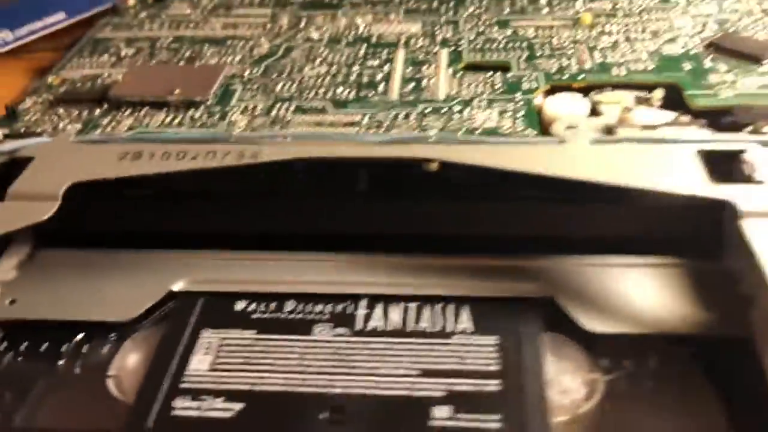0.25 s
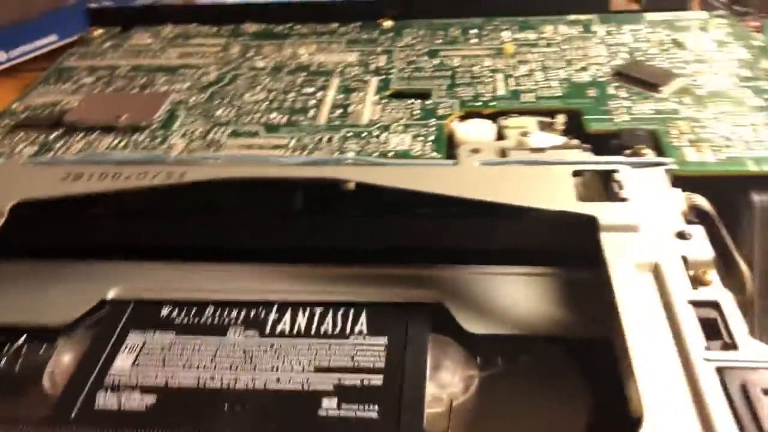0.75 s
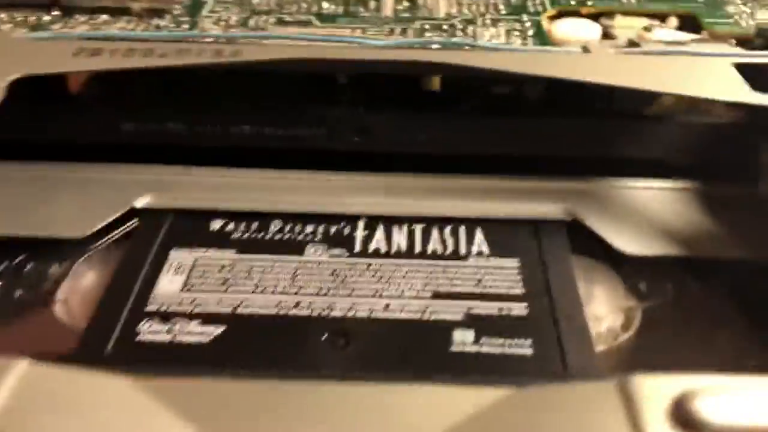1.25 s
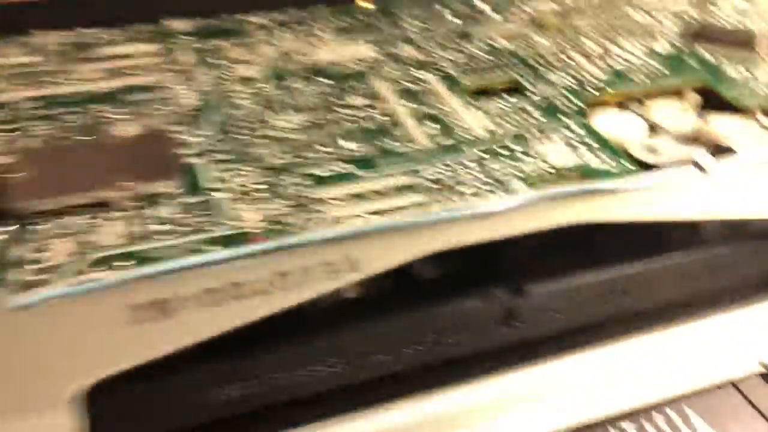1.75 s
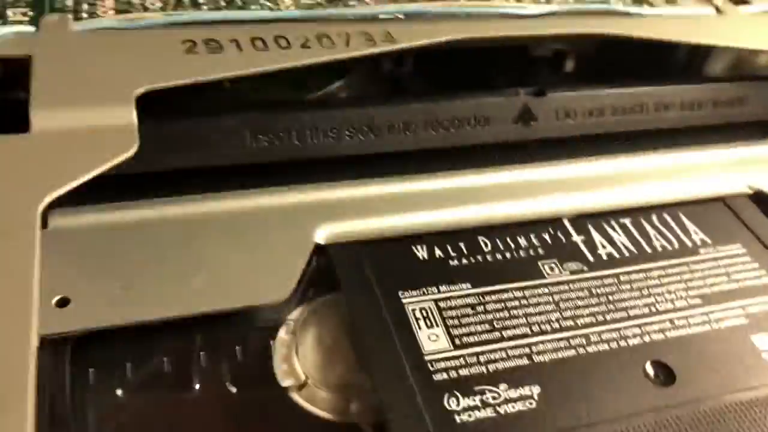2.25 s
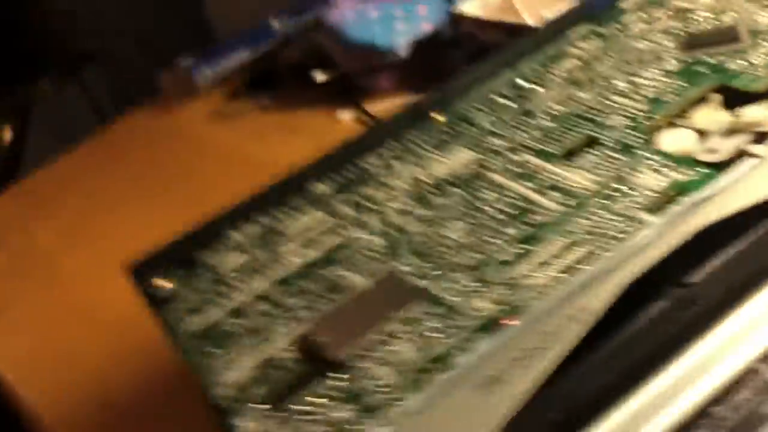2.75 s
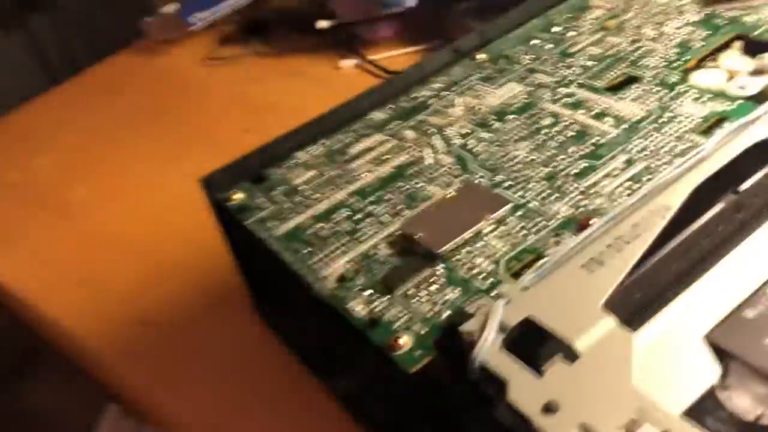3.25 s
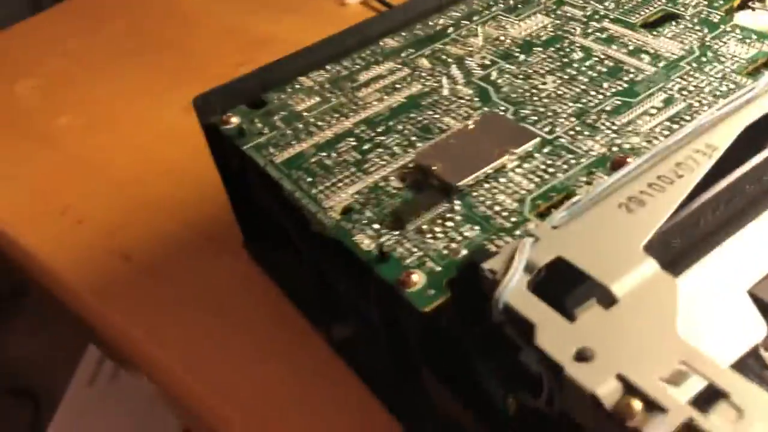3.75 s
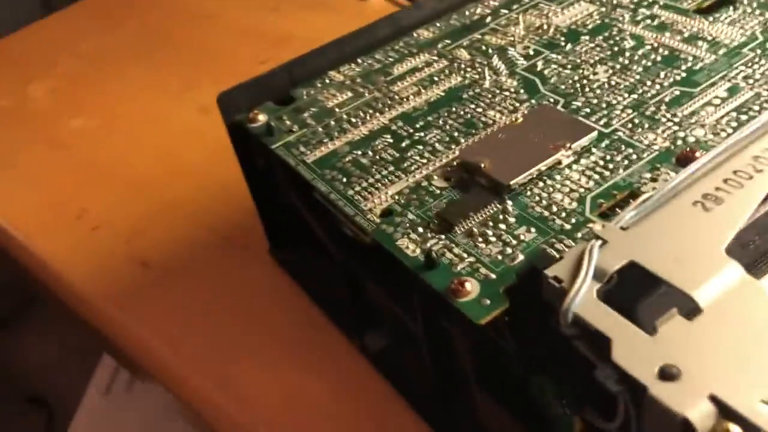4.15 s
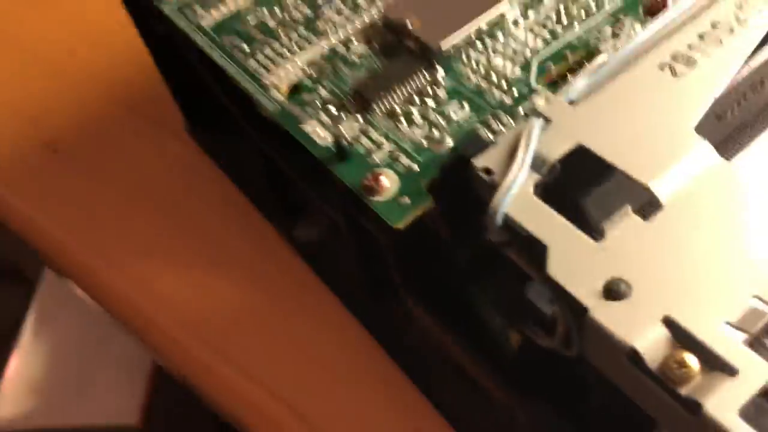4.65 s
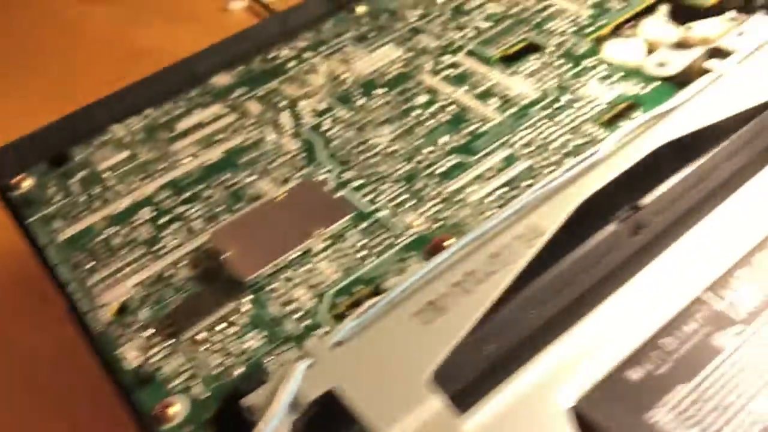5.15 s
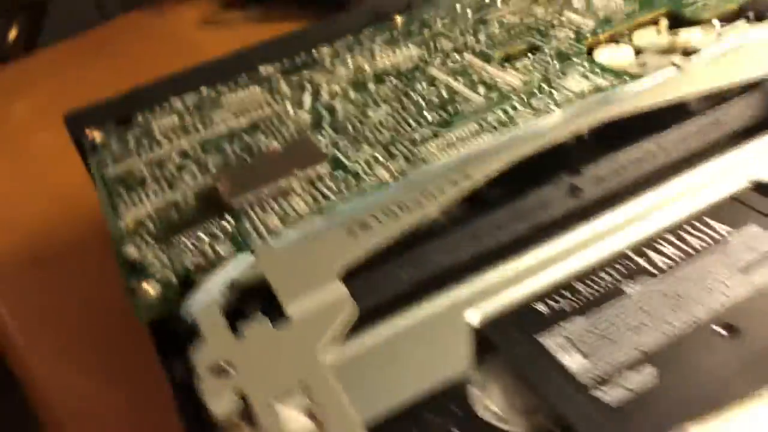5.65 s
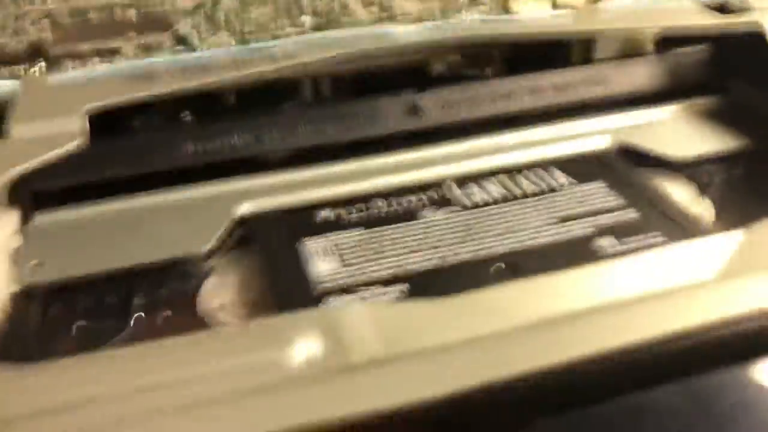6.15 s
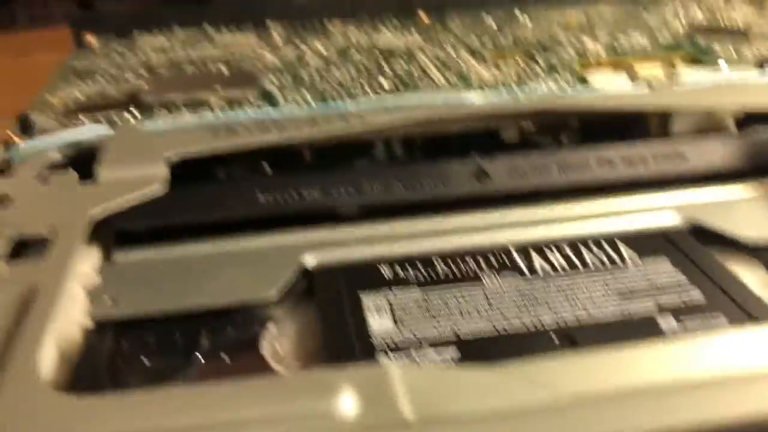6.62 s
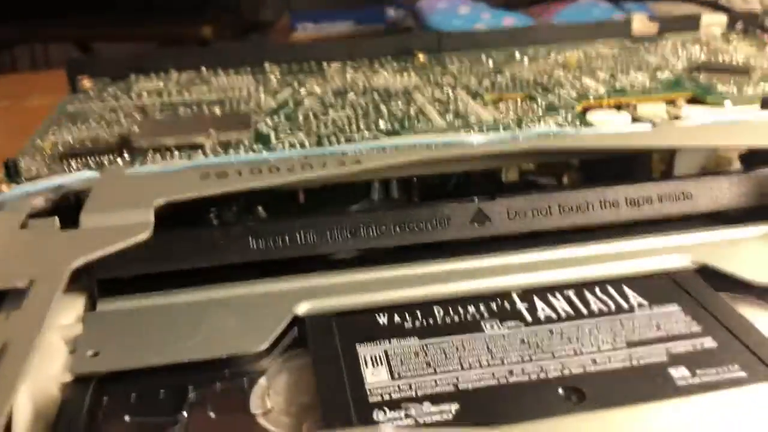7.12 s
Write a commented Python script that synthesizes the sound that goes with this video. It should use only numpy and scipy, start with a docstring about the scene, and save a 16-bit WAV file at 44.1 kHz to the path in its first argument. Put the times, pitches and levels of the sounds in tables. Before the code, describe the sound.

A cassette deck hums quietly as something scrapes over a wooden table and slams its metal chassis, followed by small clicks, thuds and faint rustles.

```python
"""Something is dragged over a wooden table and slams against the chassis of an open tape deck, very close:
friction is coloured noise driven by one speed, and blows are decaying noise, gliding knocks and chassis modes.
Parts click and clunk, short narrow-band notes sound, and thuds ring the table's low modes. Hands rustle on
and tap a camera's shell, heard as filtered noise and gliding sines. Transformer and head drum hum as unsteady
sines in a quiet room of faint noise and short reverberation."""
import sys
import numpy as np
from scipy import signal
from scipy.fft import rfft, irfft, next_fast_len
from scipy.io import wavfile
from scipy.ndimage import uniform_filter1d, map_coordinates

SR = 44100
rng = np.random.default_rng(int(sys.argv[2]) if len(sys.argv) > 2 else 0)


def elevation(decibels):
    """Turn decibel levels (scalar or array-like) into linear amplitude ratios."""
    levels = np.asarray(decibels, float)
    return 10 ** (levels / 20)


def wav_out(sig):
    """Save sig, one row per channel (or a flat mono array), as 16-bit PCM at SR to the path in sys.argv[1]."""
    wavfile.write(sys.argv[1], SR, np.round(np.clip(np.atleast_2d(sig).T, -1, 1) * 32767).astype(np.int16))


N = 325546


def unit(x):
    """Normalization of power: scale to rms 1."""
    return x / np.sqrt(np.mean(x ** 2) + 1e-20)


def peak(x):
    """Normalization of amplitude: scale to peak 1."""
    return x / np.abs(x).max()


def along(points, hz):
    """Logarithmic frequency scale: (frequency, value) points are interpolated on a log axis."""
    f, v = np.transpose(points)
    return np.interp(np.log(hz + 1), np.log(f + 1), v)


def wobble(rate):
    """Slow random modulation: a smooth curve through normal values, rate knots a second."""
    knots = rng.standard_normal(int(N * rate / SR) + 4)
    return map_coordinates(knots, [np.arange(N) * rate / SR])


def filtered(x, response):
    """Linear filtering: the spectrum of x times a complex response of frequency."""
    size = next_fast_len(len(x) + 8192)
    spectrum = rfft(x, size) * response(np.fft.rfftfreq(size, 1 / SR))
    return irfft(spectrum, size)[:len(x)]


def resonance(hz, centre_hz, width_hz):
    """Simple resonance: the causal band-pass response of one damped oscillator."""
    return 1j * hz * width_hz / (centre_hz ** 2 - hz ** 2 + 1j * hz * width_hz)


def noise(spectrum, patchy_db, grainy_db):
    """Coloured noise of rms 1: random modulation gives patches of random gain and a fast grain."""
    grains = rng.standard_normal(N) * elevation(grainy_db * wobble(400))
    z = signal.stft(grains, nperseg=256)[2]
    field = uniform_filter1d(rng.standard_normal(z.shape), 3, 0)
    field = uniform_filter1d(field, 8, 1)
    x = signal.istft(z * elevation(patchy_db * unit(field)), nperseg=256)[1][:N]
    return unit(filtered(x, lambda hz: elevation(along(spectrum, hz))))


def crowded(x, depth_db, size):
    """Modal crowding: many small parts ring along as narrow random peaks and dips that shift in time."""
    z = signal.stft(x, nperseg=512)[2]
    field = unit(uniform_filter1d(rng.standard_normal(z.shape), size, 1))
    gain_db = depth_db * field - depth_db ** 2 / 9  # the offset holds the mean power
    return signal.istft(z * elevation(gain_db), nperseg=512)[1][:N]


def ring(modes, t, spread_db):
    """Modal superposition: damped (frequency, level, t60) sines, at new strengths for each blow."""
    out = 0
    for hz, db, t60 in modes:
        strength_db = db + rng.normal(0, spread_db)
        out = out + elevation(strength_db - 60 * t / t60) * np.sin(2 * np.pi * hz * t)
    return out


def gliding(hz, t, t60, drop, drop_s):
    """Dispersion of a bending wave: its high part arrives first, so the pitch drops fast to rest."""
    turns = hz * (t + drop * drop_s * (1 - np.exp(-t / drop_s)))
    return np.sin(2 * np.pi * turns) * elevation(-60 * t / t60) * (1 - np.exp(-t / .0012))


# spectrum of the quiet room: (frequency [Hz], relative level per Hz [dB])
QUIET_SPECTRUM = [(20, -29), (35, -13), (55, -3), (100, -12), (200, -5.5), (330, -8), (490, -20),
                  (900, -25.5), (1700, -26.5), (2500, -33.5), (5000, -41), (10000, -40), (15800, -40),
                  (16400, -70)]


def room_tone():
    """Stationary background noise: a quiet room as coloured noise at -64 dB rms."""
    return elevation(-64) * noise(QUIET_SPECTRUM, patchy_db=2, grainy_db=0)


# decay of the room: (frequency [Hz], t60 [s])
ROOM_DECAY = [(100, .25), (1000, .22), (5000, .2), (15000, .12)]


def room(x):
    """Reverberation: a diffuse noise tail in which each frequency dies at its own speed."""
    hz, t, z = signal.stft(rng.standard_normal(SR // 2), SR, nperseg=256)
    decay = elevation(-60 * t / along(ROOM_DECAY, hz)[:, None])
    tail = signal.istft(z * decay, SR, nperseg=256)[1]
    delayed = np.pad(x, (300, 0))  # samples before the first reflections
    return signal.fftconvolve(delayed, tail / np.linalg.norm(tail))[:N]


# hum tones near multiples of the drum's turning rate:
# (frequency [Hz], resting level [dB rms], waver depth [dB])
HUM_TONES = [(30.2, -84.5, 2), (57.36, -69.5, 0), (90, -70.5, 2.5), (119.6, -59, 1), (149.6, -74.5, 3.5),
             (175, -70.5, 2.5), (209.5, -72, 1.5), (246, -76, 4), (363, -79.5, 2.5)]


def hum():
    """Harmonic excitation: transformer and drum motor as sines unsteady in level and phase."""
    t = np.arange(N) / SR
    out = np.zeros(N)
    for hz, db, waver_db in HUM_TONES:
        level = elevation(db + waver_db * wobble(9))
        out += level * np.sin(2 * np.pi * hz * t + .2 * wobble(4))
    return np.sqrt(2) * out  # from rms to peak


# finger taps on the camera's shell:
# (time [s], shell peak level [dB], resting shell pitch [Hz], click level over the shell [dB])
SHELL_TAPS = [(0.014, -36.5, 326, 8), (0.061, -40.5, 308, -2.5), (2.996, -21.5, 494.9, -13),
              (3.014, -47.5, 512, -3), (3.037, -50.5, 453, -1.5), (3.06, -39.5, 506, 3.5),
              (3.083, -51.5, 471, -11), (3.403, -46, 402, -2), (3.432, -46.5, 446.2, 7),
              (5.061, -51, 339, -7.5), (5.115, -47, 325, -22.5), (5.471, -49.5, 332, -14),
              (6.284, -61, 355.9, 11)]


def taps():
    """Impact and dispersion: a dry click, then a bending wave in the shell."""
    out, t = np.zeros(N + SR), np.arange(SR // 10) / SR
    t60 = 0.025  # s
    for s, db, hz, click_db in SHELL_TAPS:
        shell = gliding(hz, t, t60, drop=2.0, drop_s=0.0011)
        shell = shell + 0.7 * gliding(0.27 * hz, t, t60, drop=3.8, drop_s=0.0035)
        shell = shell * (1 - np.exp(-(t / 0.00045) ** 2))  # it builds up behind the click
        burst = rng.standard_normal(len(t)) * elevation(-60 * t / .007)
        click = filtered(burst, lambda f: resonance(f, 2800, 4500) * resonance(f, 4000, 16000))
        out[round(s * SR):][:len(t)] += elevation(db) * (peak(shell) + elevation(click_db) * peak(click))
    return out[:N]


# modes of the chassis: (frequency [Hz], relative level [dB], t60 [s])
CHASSIS_MODES = [(454, 2.5, 0.29), (866, 3.5, 0.24), (1141, -11.5, 0.16), (1378, -12.5, 0.18),
                 (1745, -12.5, 0.37), (1937, -9, 0.21), (2300, -1, 0.1), (2610, -19.5, 0.13),
                 (3520, -14, 0.14), (4950, -18.5, 0.15), (5582, -18.5, 0.15), (6290, -19, 0.26),
                 (6000, -8, 0.12), (7632, -27, 0.24)]


def chassis(f):
    """Forced vibration: rubbing is lifted a little at each mode of the chassis."""
    return 1.5 + 0.22 * sum(resonance(f, hz, 0.12 * hz) for hz, db, t60 in CHASSIS_MODES)


def noise_swells(rows, width):
    """Resonant filtering: grainy noise under a swell, in one resonance of given width over pitch."""
    out = np.zeros(N + SR)
    for start, end, hz, db, place in rows:
        size = round((end - start) * SR)
        position = np.linspace(0, 1, size)
        swell = np.interp(position, [0, np.clip(place, .02, .98), 1], [0, 1, 0]) ** 0.95
        grain = elevation(1.1 * np.repeat(rng.standard_normal(SR // 100), 100))  # a new gain every 2.3 ms
        rub = grain * rng.standard_normal(SR)
        rub = filtered(rub, lambda f: resonance(f, hz, width * hz) ** 2 * chassis(f))
        out[round(start * SR):][:size] += elevation(db) * swell * unit(rub[:size])
    return out[:N]


# the grip shifts on the camera: (time [s], level at the top of the swell [dB rms])
GRIP_SHIFTS = [(0.061, -43), (5.581, -57), (6.491, -49.5), (7.231, -49.5)]


def grips():
    """Low-frequency friction: each shift of the grip is a 32 ms swell of noise round 58.4 Hz."""
    rows = [(s, s + 0.032, 58.4, db, 0.43) for s, db in GRIP_SHIFTS]
    return noise_swells(rows, width=1)


# low modes of the table:
# (frequency [Hz], t60 [s], relative level [dB], level lost per dB of a weaker thud [dB/dB])
TABLE_MODES = [(55.04, 0.42, -7, 0.73), (138.3, 0.075, 6.5, -1), (218, 0.053, 1, -0.5)]
# weight landing on the table: (time [s], peak level [dB])
LANDINGS = [(1.519, -52), (1.545, -42), (1.626, -20.5), (1.66, -36), (1.722, -33.5), (1.889, -39.5),
            (2.707, -49), (4.005, -47), (4.151, -48.5), (4.59, -48), (4.937, -31.5), (4.972, -41.5)]


def thuds():
    """Modal excitation: the table answers after a moment; heavier thuds favour its lowest mode."""
    out, t = np.zeros(N + SR), np.arange(SR // 2) / SR
    loudest_db = max(db for s, db in LANDINGS)
    build_up = 1 - np.exp(-(t / .014) ** 2)
    for s, db in LANDINGS:
        modes = [(f, level - loss * (loudest_db - db), life) for f, life, level, loss in TABLE_MODES]
        thud = ring(modes, t, spread_db=2) * build_up
        out[round(s * SR):][:len(t)] += elevation(db) * peak(thud)
    return out[:N]


# short rubbing strokes: (start [s], end [s], loudest pitch [Hz],
# level at the top of the swell [dB rms], place of the top [0-1])
RUBBING_STROKES = [(0.051, 0.058, 6000, -62, 0.6), (0.4, 0.53, 520, -52, 0), (0.835, 0.927, 4400, -38, 0.7),
                   (0.994, 1.081, 2470, -34.5, 0.48), (1.0, 1.15, 12000, -44.5, 0),
                   (1.392, 1.565, 810, -42.5, .5), (1.55, 1.604, 901, -36, 0.4),
                   (1.604, 1.69, 2210, -21.5, 0.14), (2.254, 2.272, 5500, -44, .5),
                   (2.63, 2.8, 900, -51.5, 0), (2.993, 3.027, 3900, -62, 0.43),
                   (3.382, 3.399, 1296, -52.5, 0.78), (3.387, 3.40, 7960, -63.5, .6),
                   (3.939, 4.086, 1665, -48, 0.14), (3.937, 4.07, 9500, -58.5, 0.25),
                   (4.097, 4.175, 900, -48.5, 0.11), (4.111, 4.17, 11000, -59.5, 0.05),
                   (4.27, 4.45, 1780, -56.5, 0.62), (4.46, 4.56, 1000, -54.5, 0.17),
                   (4.29, 4.45, 9030, -66.5, 0.67), (4.554, 4.67, 11000, -63, 0.56),
                   (4.568, 4.681, 686, -47, 0.13), (4.8, 4.935, 1300, -63, 0.93),
                   (4.93, 4.98, 1475, -52.5, 0.38), (4.98, 5.03, 2155, -55, .4),
                   (4.953, 5.037, 8000, -62.5, 0.66), (5.31, 5.38, 5870, -69, .4),
                   (5.50, 5.56, 9500, -61.5, 0.42), (5.63, 5.76, 12010, -72, 0.41),
                   (5.906, 6.027, 4320, -64.5, 0.05), (6.112, 6.149, 1500, -65, 0.63),
                   (6.201, 6.294, 10000, -68.5, 0.34), (6.296, 6.313, 2497, -60.5, .27),
                   (6.431, 6.501, 6480, -59, 0.97), (6.44, 6.5, 1500, -61.5, 0.64),
                   (7.21, 7.243, 7890, -48.5, .6), (7.21, 7.241, 14450, -55.5, 0.53),
                   (7.199, 7.263, 1797, -61.5, 0.52)]


def strokes():
    """Broadband friction: short strokes of noise in a resonance wider than its pitch."""
    return noise_swells(RUBBING_STROKES, width=1.4)


# short narrow-band notes, rings after blows and brief groans: (start [s], end [s], pitch [Hz],
# level at the top of the swell [dB rms], place of the top [0-1])
NARROW_NOTES = [(0.362, 0.39, 1490, -28.5, 0), (0.709, 0.724, 819.6, -31.5, 0.36),
                (2.05, 2.206, 770, -38.5, 0.22), (4.571, 4.61, 449, -43, 0), (6.535, 6.588, 804, -55, 0.03)]


def narrow_notes():
    """Narrow resonance: short narrow-band notes, rings after blows and brief groans."""
    return noise_swells(NARROW_NOTES, width=0.25)


# rubbing: (time [s], speed as a drive level [dB], extra weight on the table [dB])
RUB_MOTION = [(0, -69, 2.5), (0.2, -80.5, -2.5), (0.42, -75.5, -4), (0.65, -73, -6), (0.67, -67.5, 8.5),
              (0.728, -46.5, 8), (0.788, -43, 0), (0.848, -39, -2), (0.908, -41, 0.5), (0.998, -39, -0.5),
              (1.147, -44, 0.5), (1.27, -61.5, 7), (1.398, -44, -8), (1.546, -41.5, 4.5),
              (1.66, -38.5, 13.5), (1.734, -37, -1), (1.874, -47.5, 4), (2.008, -44, 0), (2.076, -53, 8),
              (2.206, -61.5, 3), (2.346, -64, -1), (2.52, -67.5, -2), (2.62, -61, -2.5), (2.9, -73.5, -0.5),
              (3.6, -78, -2), (3.9, -74, 0), (4.25, -70, 1), (4.7, -73, 4.5), (5.2, -74.5, 2),
              (6.3, -74.5, -1.5), (6.6, -76, 3.5), (6.87, -75.5, -1.5), (7.38, -74, 0)]
# spectra of the rubbed surfaces (wood, plastic, skin and cloth), dull to bright, each:
# (frequency [Hz], relative level per Hz [dB])
DRAG_SPECTRUM = [(100, -28), (200, -2.5), (350, -4.5), (530, 0.5), (900, -3.5), (1500, -9.5), (2000, -28),
                 (3300, -120)]
SCRAPE_SPECTRUM = [(590, -35), (1000, 1), (1600, 2.5), (1740, 3.5), (2680, 0), (3800, -4.5), (5500, -18),
                   (7150, -36.5), (12100, -120)]
RUSTLE_SPECTRUM = [(2350, -29), (4000, -1.5), (4470, -1.5), (8120, -8), (12600, -14), (15100, -11),
                   (16000, -21.5)]


def rubbing():
    """Sliding friction: one speed drives three surfaces; the contact stutters and excites the chassis."""
    s, *controls = np.transpose(RUB_MOTION)
    speed_db, weight_db = [np.interp(np.arange(N) / SR, s, c) for c in controls]
    over_reference_db = speed_db + 40  # reference speed is -40 dB
    # drag and rustle grow by 0.75 and 0.94 dB per dB of speed
    drag = elevation(-43.5 + 0.75 * over_reference_db + weight_db)
    rustle = elevation(-45.5 + 0.94 * over_reference_db + 3.5 * wobble(4.7))  # slow unrest of the skin
    stutter = elevation(0.97 * wobble(35))
    rub = drag * noise(DRAG_SPECTRUM, patchy_db=2.5, grainy_db=1.5)
    rub = rub + elevation(speed_db) * noise(SCRAPE_SPECTRUM, patchy_db=2.5, grainy_db=-0.5)
    rub = elevation(-4.0) * filtered(rub, chassis)
    rub = rub + rustle * noise(RUSTLE_SPECTRUM, patchy_db=1.5, grainy_db=1.0)
    return crowded(stutter * rub, depth_db=3, size=24)


# blows: (time [s], body peak level [dB], loudest pitch [Hz], t60 of the noise burst [s],
# crack level over the body [dB])
CHASSIS_BLOWS = [(0.359, -16, 1870, 0.0221, -2.5), (0.366, -30, 1460, 0.045, -26),
                 (0.396, -30, 1600, 0.013, 1), (0.598, -47.5, 814, 0.044, -26),
                 (0.67, -32.5, 1140, 0.042, -36), (0.709, -27.5, 810, 0.028, -19),
                 (0.738, -28, 4040, 0.056, -8), (1.263, -41.5, 2200, 0.057, -35),
                 (1.518, -18, 920, 0.025, -20), (1.545, -28, 1186, 0.37, -4.5),
                 (1.609, 0, 1815, 0.042, -5.5), (1.625, -7.5, 780, 0.077, -4.5),
                 (1.644, -18.5, 740, 0.054, 1), (1.66, -27, 1080, 0.028, -11),
                 (1.681, -22.5, 1140, 0.1, -6), (1.721, -27, 420, 0.086, -16),
                 (1.845, -25.5, 681.4, 0.076, -35.5), (1.887, -25.5, 597.6, 0.021, -27),
                 (2.262, -36.5, 871.7, 0.037, -27), (2.626, -27.5, 1476, 0.042, -1.5),
                 (2.652, -40.5, 3870, 0.03, -10), (2.678, -35.5, 880, 0.088, -21),
                 (2.706, -38, 643.3, 0.021, -11), (4.004, -31, 1189, 0.035, -10),
                 (4.105, -36.5, 1640, 0.037, -20), (4.11, -36.5, 1500, 0.02, -2),
                 (4.151, -42, 468, 0.066, -27.5), (4.304, -49.5, 868, 0.04827, -0.5),
                 (4.355, -40.5, 1566, 0.056, -19), (4.403, -41, 1210, 0.077, -27),
                 (4.463, -33, 910, 0.033, -26), (4.495, -44.5, 890, 0.073, -32),
                 (4.531, -42.5, 896, 0.062, -27), (4.541, -49, 4500, 0.03, 4),
                 (4.568, -22.5, 610, 0.038, -19.5), (4.589, -45, 587, 0.029, -26),
                 (4.932, -38.5, 1646, 0.058, -30), (6.488, -42, 556.3, 0.028, -5)]


def blows():
    """Impact excitation: a knock and a rattle round one pitch, nearby chassis modes, a treble crack."""
    out, t = np.zeros(N + SR), np.arange(SR // 2) / SR
    rise = 1 - np.exp(-t / [[.002], [.0007]])  # rattle, crack
    for s, db, hz, t60, crack_db in CHASSIS_BLOWS:
        burst = rng.standard_normal((2, len(t))) * elevation(-60 * t / t60) * rise

        def rattle_response(f):
            """Resonance with a skirt: a narrow peak and a wide one with a softened treble."""
            skirt = resonance(f, hz, 3.9 * hz) ** 2 / (1 + 1j * f / (3 * hz)) ** 2
            return resonance(f, hz, .5 * hz) ** 2 + 0.79 * skirt

        rattle = filtered(burst[0], rattle_response)
        knock = gliding(.95 * hz, t, 0.3 * t60, drop=.6, drop_s=0.0042)
        # modes weaken by 10 dB per octave away from the blow's pitch
        near = [(f, level - 10 * abs(np.log2(f / hz)), min(life, 2.1 * t60))
                for f, level, life in CHASSIS_MODES]
        modes = ring(near, t, spread_db=5)
        crack = filtered(burst[1], lambda f: resonance(f, 6300, 28000) ** 2)
        body = peak(0.78 * peak(rattle) + .6 * knock + 0.37 * peak(modes))
        out[round(s * SR):][:len(t)] += elevation(db) * (body + elevation(crack_db) * peak(crack))
    return out[:N]


def scene():
    """Superposition: deck, hands and room; taps reach the microphone through the shell, not the room."""
    near = grips() + thuds() + strokes() + narrow_notes() + blows()
    return (room_tone() + hum() + taps() + rubbing() + near + elevation(-13.5) * room(near))[None]


# response of the microphone: (frequency [Hz], gain [dB])
MIC_RESPONSE = [(20, -15), (45, -2), (70, 0), (15700, 0), (16200, -35), (17000, -90)]


def microphone(x):
    """Band limitation: the lowest bass is weakened and the top of the treble cut off."""
    return filtered(x, lambda hz: elevation(along(MIC_RESPONSE, hz)))


def low_pass(x):
    """Removes everything above the highest recorded frequency."""
    return signal.sosfilt(signal.butter(12, 17010, fs=SR, output="sos"), x)


def record(dry):
    """Saturation and band limitation: the loudest peaks flatten, then the microphone's range is applied."""
    flat = dry[0] / (1 + np.abs(dry[0] / .85) ** 4) ** (1 / 4)
    mix = microphone(flat)[None]
    return low_pass(mix)


dry = scene()
out = record(dry)
wav_out(out)
```